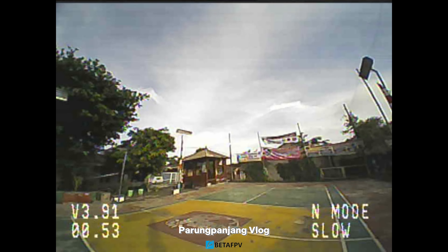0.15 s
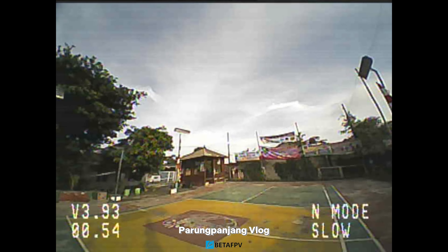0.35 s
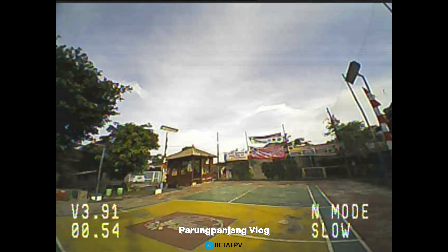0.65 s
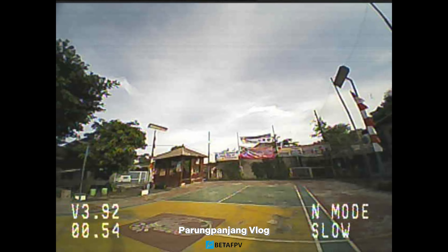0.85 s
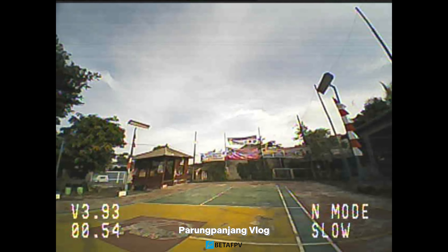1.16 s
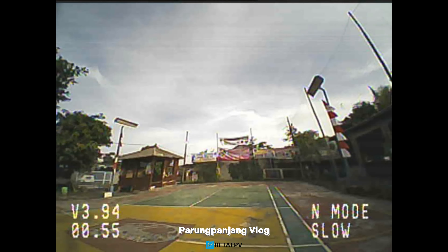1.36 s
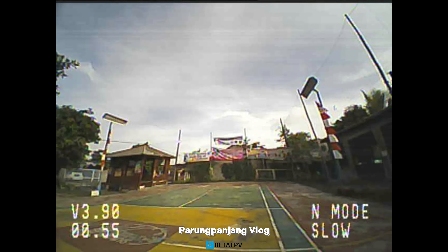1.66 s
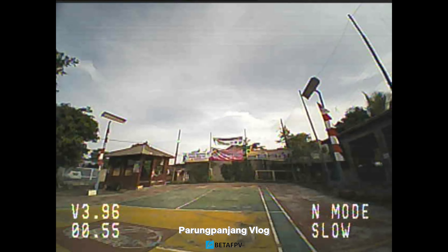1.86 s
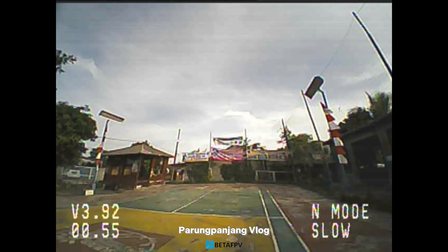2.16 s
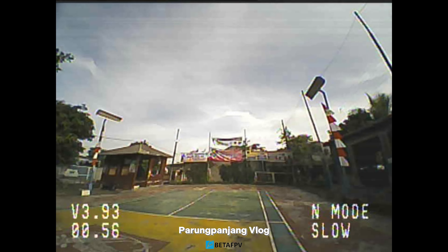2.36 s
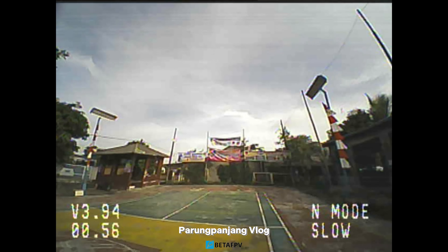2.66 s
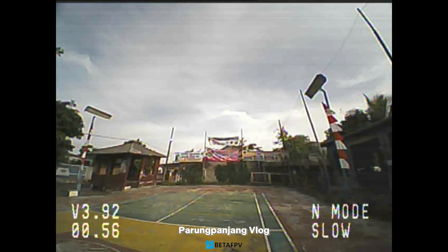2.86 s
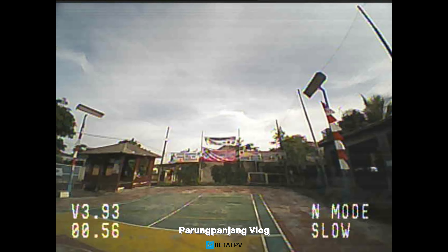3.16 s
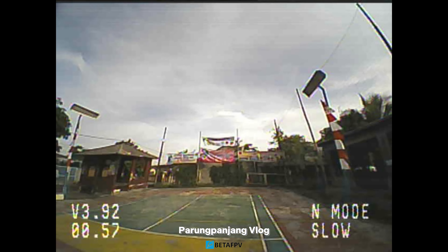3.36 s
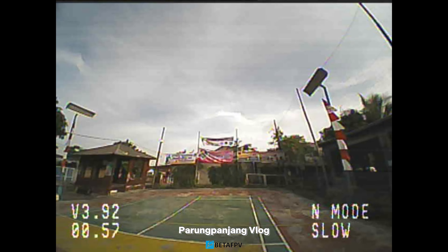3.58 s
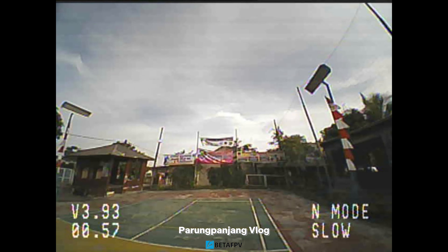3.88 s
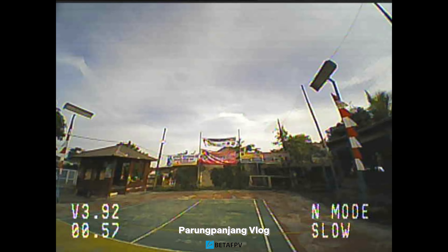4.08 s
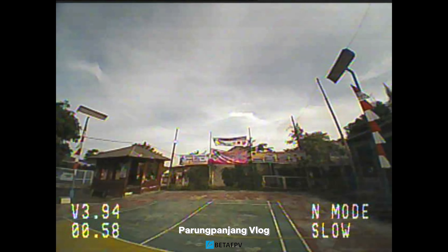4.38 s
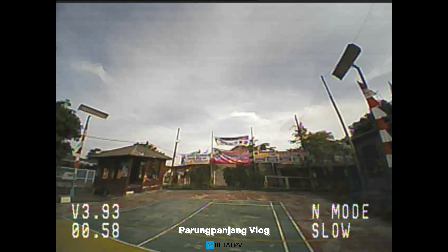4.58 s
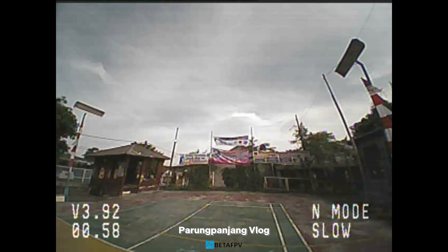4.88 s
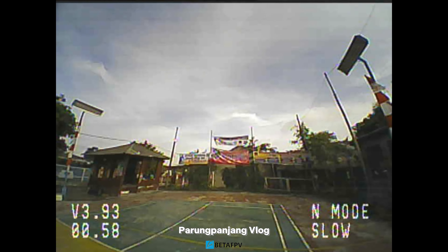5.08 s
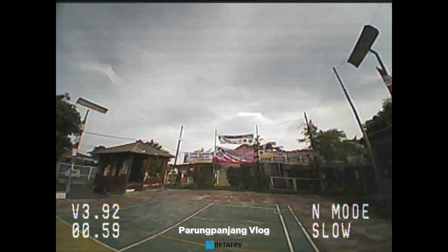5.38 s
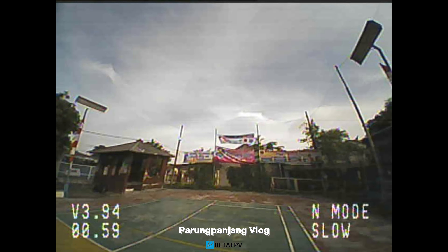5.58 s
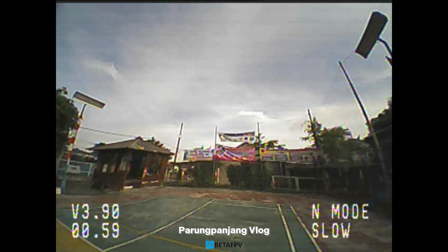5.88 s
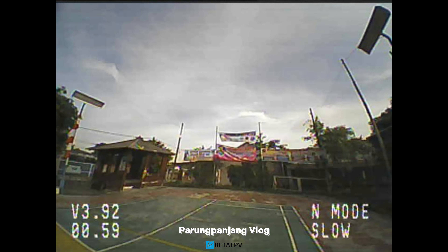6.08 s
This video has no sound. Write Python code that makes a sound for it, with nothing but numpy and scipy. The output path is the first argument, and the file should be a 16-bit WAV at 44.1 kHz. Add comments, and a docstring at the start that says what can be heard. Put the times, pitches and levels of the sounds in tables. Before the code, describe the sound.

A small drone hovers outdoors and is heard without a break for about six seconds. Its four propellers make a cluster of high whining tones, each at its own slightly different pitch, all fluttering quickly and drifting up and down. A bright, steady rush of air from the blades surrounds them, and a faint low hum lies underneath. At about 2.4 seconds the highest whine throbs briefly and sits a little higher until about 3 seconds. From about 4.5 seconds the upper tones climb while the lowest sinks, and the whine and rush flare up. Between 5 and 5.8 seconds the lowest whine swells clearly louder, easing briefly in the middle. Two quick, shriller throbs follow just before 6 seconds as the drone keeps flying. The sound is mono, with the highest treble cut off.

```python
"""Small drone hovering outdoors

Four three-blade propellers whine, each at its own wavering speed, over the rush of blade turbulence.
Bands of whine and rush flare up as the pitches climb or sink, and near the end the lowest whine
swells louder near 1100 Hz. A faint steady low hum lies underneath.
The recorder is narrow-band, sits on a steady offset and limits its peaks."""
import sys
import numpy as np
from scipy import signal
from scipy.fft import rfft, irfft
from scipy.io import wavfile
from scipy.ndimage import uniform_filter1d, minimum_filter1d

SR = 44100
rng = np.random.default_rng(int(sys.argv[2]) if len(sys.argv) > 2 else 0)


def materialize(psi):
    """Save the field psi as 16-bit PCM at rate SR to the path in sys.argv[1].

    A 1-D psi becomes a single channel; in a 2-D psi each row is a channel.
    """
    bounded = np.clip(np.atleast_2d(psi).T, -1, 1)
    quanta = np.round(bounded * 32767).astype(np.int16)
    wavfile.write(sys.argv[1], SR, quanta)


N = 275184
BLADES = 3

# The multiples of the shaft speed that sing. Order 3 is the blade-pass tone.
ORDERS = [1, 2, 3, 4, 6, 9, 12, 15]
# Each row is a rotor (fastest, second, slowest, third): the base level of each order in dB.
ORDER_LEVELS = [(-55, -66.5, -42.5, -66, -42, -43.5, -42, -59.5),
                (-64.5, -67.5, -48.5, -69, -49, -49, -50.5, -55.5),
                (-65, -75, -47.5, -67, -44, -43.5, -48, -49.5),
                (-67.5, -78, -49.5, -69, -52, -48.5, -51, -51.5)]
# Speed hunting under the flight controller, same rotors. Each row: rate in Hz, rms pitch depth in Hz.
HUNTING = [(16.2, 8.96), (14, 8.8), (13, 5.37), (12, 6)]
# Pitch lines of three rotors. Each row: time in seconds, blade-pass pitch in Hz.
FASTEST_PITCH = [(0.0, 1384), (0.16, 1420), (0.22, 1398), (0.46, 1425), (0.69, 1396), (0.86, 1424),
                 (0.97, 1402), (1.14, 1434), (1.47, 1402), (1.7, 1439), (1.77, 1399), (2.0, 1420),
                 (2.17, 1472), (2.27, 1447), (2.33, 1479), (3.04, 1478), (3.23, 1413), (3.42, 1450),
                 (3.61, 1415), (3.9, 1424), (4.28, 1395), (4.56, 1490), (4.77, 1443), (4.94, 1528),
                 (5.01, 1537), (5.035, 1562), (5.065, 1541), (5.095, 1578), (5.122, 1522), (5.176, 1522),
                 (5.206, 1562), (5.242, 1526), (5.296, 1537), (5.364, 1561), (5.42, 1584), (5.448, 1525),
                 (5.476, 1587), (5.506, 1523), (5.528, 1553), (5.58, 1518), (5.62, 1536), (5.76, 1507),
                 (6.02, 1498), (6.24, 1501)]
SECOND_PITCH = [(0.0, 1322), (0.84, 1342), (1.84, 1339), (2.42, 1361), (2.7, 1336), (3.05, 1352),
                (3.6, 1327), (4.4, 1335), (4.95, 1404), (5.55, 1442), (6.05, 1384), (6.24, 1400)]
SLOWEST_PITCH = [(0.0, 1284), (0.28, 1249), (0.68, 1226), (0.87, 1254), (1.25, 1205), (1.5, 1246),
                 (1.61, 1230), (1.7, 1250), (1.8, 1208), (1.92, 1235), (2.28, 1154), (2.4, 1181),
                 (2.62, 1182), (2.73, 1154), (2.85, 1185), (3.25, 1172), (3.5, 1233), (3.88, 1201),
                 (4.1, 1248), (4.31, 1208), (4.47, 1219), (4.57, 1158), (4.86, 1150), (5.0, 1117),
                 (5.04, 1080), (5.09, 1075), (5.125, 1135), (5.19, 1101), (5.33, 1175), (5.4, 1143),
                 (5.46, 1159), (5.57, 1100), (5.63, 1142), (5.75, 1144), (5.84, 1197), (5.97, 1189),
                 (6.04, 1163), (6.24, 1166)]
# The third rotor shadows the slowest. Each row: time in seconds, pitch above the slowest in Hz.
THIRD_GAP = [(2.2, 0), (2.55, 68), (3.3, 82), (3.7, 45), (3.88, 68), (4.05, 0), (4.5, 8), (4.75, 55),
             (4.95, -0.5)]
# The balance as the drone turns and tilts. Each row: time in seconds, then gain in dB for the
# fastest, second, slowest and third rotor.
FACING = [(0.0, 0, 0.5, -1, 0), (1.9, 0, -1, 1, -2), (2.3, 1, 0, -0.5, -3), (2.7, 1, -0.5, -4, -3),
          (3.3, 0.5, -3.5, -3.5, -1.5), (3.8, 0, -1.5, -1, 0.5), (4.3, 0, -0.5, 0, -1),
          (4.8, 2, -0.5, 0.5, 0), (5.0, 2, 3.5, 1.5, -14), (5.35, 1.5, 4, 0, -13.5),
          (5.751, 0.5, 3, 3, -12), (6.24, 0.5, 2, 2, -14)]
# The fastest rotor's shaft tone swells as it speeds up. Each row: time in seconds, gain in dB.
SHAFT_SWELL = [(4.88, -2.5), (4.96, -0.5), (5.01, 7.5), (5.65, 9.5), (5.85, 9), (6.0, 5.5), (6.1, 3.5),
               (6.24, 2)]
# Brief throbs of the fastest rotor. Each row: centre in seconds, length in seconds, order, gain in dB.
THROBS = [(2.38, 0.25, 3, 8.5), (4.915, 0.036, 3, 4.5), (5.926, 0.057, 6, 10.5), (5.988, 0.039, 6, 13)]
# How well a tone carries to the listener. Each row: pitch in Hz, gain in dB.
CARRY = [(1100, -1.5), (1180, -1.5), (1250, -0.5), (1450, -0.5), (2350, -1), (2480, -0.5), (2830, 1),
         (2950, -1.5), (3300, -6.5), (3450, -3), (3550, 0), (3750, 1), (4250, -0.5), (4420, 2), (4700, -4),
         (5000, 1.5), (5700, -1), (5900, -2), (6200, -5)]
# Sharp peaks that the tones sweep into. Each row: centre in Hz, width in Hz, gain in dB.
SHARP_PEAKS = [(1578, 27, 8), (3156, 55, 7.5)]
# Bands of whine and rush that flare up as the fastest rotor climbs or the slowest sinks past a pitch.
# Each row: low edge in Hz, high edge in Hz, full boost in dB, waking pitch in Hz.
CLIMB_FLARES = [(473, 553.7, 11.5, 1500), (1541.4, 1612, 13, 1464), (1607, 1742, 12.5, 1518),
                (2933, 3330, 6.5, 1492), (3100, 3290, 7.5, 1520)]
SINK_FLARES = [(2020, 2290, 8.6, 1120), (3310, 3460, 4.4, 1125)]
# The lowest whine swells louder near 1100 Hz. Each row: start in seconds, end in seconds, boost in dB.
LOW_SWELLS = [(5.026, 5.296, 17), (5.299, 5.52, 9.5), (5.518, 5.8, 16)]
# The colour of the blade turbulence. Each row: frequency in Hz, relative level in dB.
RUSH_COLOUR = [(130, -26), (165, -17), (210, -10.5), (600, -13.5), (1000, -11.5), (1600, -8.5),
               (2100, -7.5), (2700, -3), (3400, -4), (4600, -3), (5400, -0.5), (6200, 0.5)]
# A faint steady low hum. Each row: frequency in Hz, rms level in dB ahead of the limiter.
LOW_HUM = [(86.13, -53), (129.2, -65)]
# The recorder's treble roll-off. Each row: frequency in Hz, gain in dB.
TREBLE_ROLL = [(6300, 1), (6800, -3.5), (7100, -15), (7300, -21.5), (7450, -46.5)]


def rotor(blade_hz, facing_db, hunting, levels_db, lifts_db):
    """One propeller's whine: shaft orders on a hunting speed, fluttering in disturbed inflow."""
    rate_hz, depth_hz = hunting
    turns = np.cumsum(blade_hz + depth_hz * wander(rate_hz, width_hz=5.05)) / BLADES / SR
    whine = np.zeros(N)
    for order, base_db in zip(ORDERS, levels_db):
        flutter_db = 2.1 if order >= BLADES else 1.1  # the shaft's own imbalance tone is steadier
        steady_db = base_db + carry_db(blade_hz * order / BLADES) + facing_db
        level_db = steady_db + lifts_db.get(order, 0) + flutter_db * wander(0, width_hz=44.4)
        phase_slip = .04 * order * wander(0, width_hz=60)  # higher orders blur more
        phase = 2 * np.pi * (order * turns + rng.random()) + phase_slip
        whine += np.sqrt(2) * gain_of(level_db) * np.cos(phase)
    return whine


def carry_db(hz):
    """How strongly a tone reaches the listener: broad colour plus sharp peaks."""
    peaks_db = sum(db * np.exp(-((hz - centre) / width) ** 2) for centre, width, db in SHARP_PEAKS)
    return curve(hz, CARRY) + peaks_db


def throb_db(t, order):
    """Bell-shaped swells on one tone of the fastest rotor."""
    return sum(db * np.exp(-(2 * (t - centre) / length) ** 2)
               for centre, length, throb_order, db in THROBS if throb_order == order)


def band_flares(sound, fastest_hz, slowest_hz, wake_span_hz=3.5, linger_s=0.051):
    """Bands flare up while a rotor is past a waking pitch; the lowest whine swells at set times."""
    hz, t, spectra = signal.stft(sound, SR, nperseg=1024, noverlap=896)
    # the flares lag: they follow the average pitch over the last linger_s
    lagged = np.clip(((t - linger_s / 2) * SR).astype(int), 0, N - 1)
    fast = uniform_filter1d(fastest_hz, size=round(linger_s * SR))[lagged]
    slow = uniform_filter1d(slowest_hz, size=round(linger_s * SR))[lagged]
    bands = [(lo, hi, db * soft_step(fast - wake, wake_span_hz)) for lo, hi, db, wake in CLIMB_FLARES]
    bands += [(lo, hi, db * soft_step(wake - slow, wake_span_hz)) for lo, hi, db, wake in SINK_FLARES]
    swell_band_hz = (1027, 1175)
    bands += [(*swell_band_hz, db * plateau(t, start, end, edge=0.013)) for start, end, db in LOW_SWELLS]
    boost_db = sum(np.outer(plateau(hz, lo, hi, edge=15), db) for lo, hi, db in bands)
    return signal.istft(spectra * gain_of(boost_db), SR, nperseg=1024, noverlap=896)[1][:N]


def blade_rush(level_db=-26.5):
    """Blade turbulence: a bright bed of noise with faint drifting patches."""
    frames, hz = N // 256 + 5, np.fft.rfftfreq(1024, 1 / SR)
    real, imaginary, patches = rng.standard_normal((frames, len(hz), 3)).T
    patches = uniform_filter1d(patches, size=10, axis=0)  # smear across frequency
    patches = unit_rms(uniform_filter1d(patches, size=12, axis=1))  # and across time
    knots_hz, knots_db = np.transpose(RUSH_COLOUR)
    colour_db = np.interp(np.log(hz + 1), np.log(knots_hz), knots_db) - 40 * (hz < 100)
    spectra = (real + 1j * imaginary) * gain_of(colour_db[:, None] + .8 * patches)
    noise = signal.istft(spectra, nperseg=1024, noverlap=768)[1][:N]
    return gain_of(level_db) * unit_rms(noise)


def low_hum(t):
    """A faint steady low hum of two sine tones."""
    return sum(np.sqrt(2) * gain_of(db) * np.sin(2 * np.pi * hz * t) for hz, db in LOW_HUM)


def wander(centre_hz, width_hz, hop=64):
    """Slow random modulation: noise in a bell-shaped band, rms about 1."""
    steps = N // hop + 2
    hz = np.fft.rfftfreq(steps, hop / SR)
    bell = np.exp(-((hz - centre_hz) / width_hz) ** 2) * (hz > 0)
    drift = irfft(rfft(rng.standard_normal(steps)) * bell, steps)
    return np.interp(np.arange(N) / hop, np.arange(steps), unit_rms(drift))


def soft_step(x, edge):
    """Fades from 0 to 1 as x passes zero."""
    return .5 * (1 + np.tanh(x / edge))


def plateau(x, start, end, edge):
    """1 between start and end, with soft edges."""
    return soft_step(x - start, edge) - soft_step(x - end, edge)


def curve(x, points):
    """Straight lines between breakpoints."""
    return np.interp(x, *np.transpose(points))


def gain_of(db):
    """Decibels to amplitude."""
    return 10 ** (np.asarray(db) / 20)


def unit_rms(x):
    """Scales to rms 1."""
    return x / np.sqrt(np.mean(x ** 2) + 1e-20)


def scene():
    """Four whining rotors and their rush, with flaring bands, in mono."""
    t = np.arange(N) / SR
    fastest, second, slowest = (curve(t, line) for line in (FASTEST_PITCH, SECOND_PITCH, SLOWEST_PITCH))
    blade_hz = [fastest, second, slowest, slowest + curve(t, THIRD_GAP)]
    times, *facing_columns = np.transpose(FACING)
    facing_db = [np.interp(t, times, db) for db in facing_columns]
    fastest_lifts_db = {1: curve(t, SHAFT_SWELL), 3: throb_db(t, order=3), 6: throb_db(t, order=6)}
    whine = sum(map(rotor, blade_hz, facing_db, HUNTING, ORDER_LEVELS, [fastest_lifts_db, {}, {}, {}]))
    return band_flares(whine + blade_rush(), fastest, slowest)[None]


def record(dry, offset=.7054, ceiling=.95, band_edge_hz=7488):
    """Treble roll-off, a steady offset, a limiter that ducks the whole mix, then the band limit."""
    t, hz = np.arange(N) / SR, np.fft.rfftfreq(N, 1 / SR)
    dulled = irfft(rfft(dry[0]) * gain_of(curve(hz, TREBLE_ROLL)), N)
    mix = dulled + offset + low_hum(t)
    safe_gain = np.minimum(ceiling / np.maximum(abs(mix), 1e-9), 1)
    held_gain = minimum_filter1d(safe_gain, size=600)
    limited = mix * uniform_filter1d(held_gain, size=500)
    lowpass = signal.firwin(1025, band_edge_hz, window=("kaiser", 9), fs=SR)
    return signal.oaconvolve(np.pad(limited, 512, "reflect"), lowpass, "valid")[None]


dry = scene()
out = record(dry)
materialize(out)
```